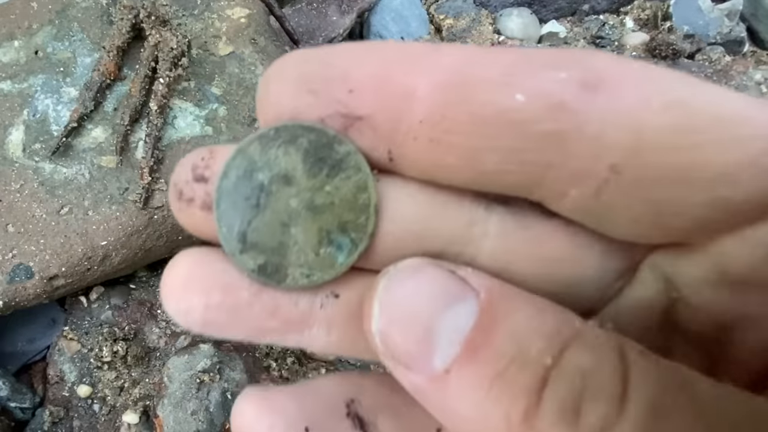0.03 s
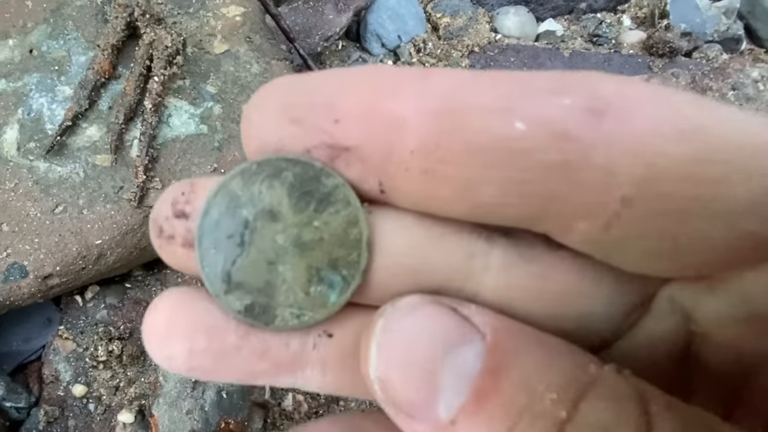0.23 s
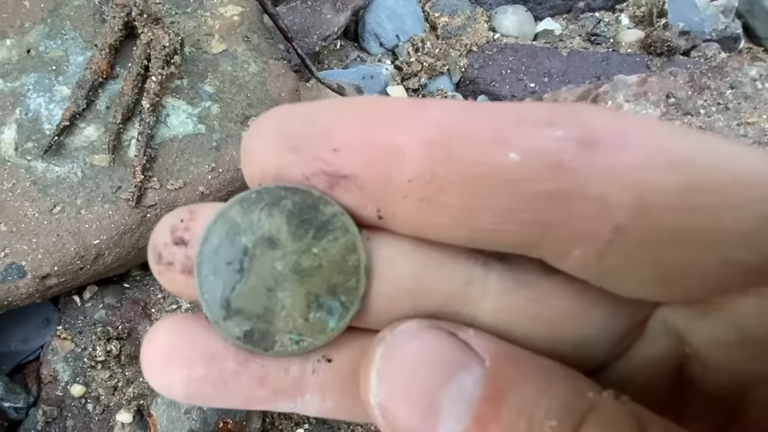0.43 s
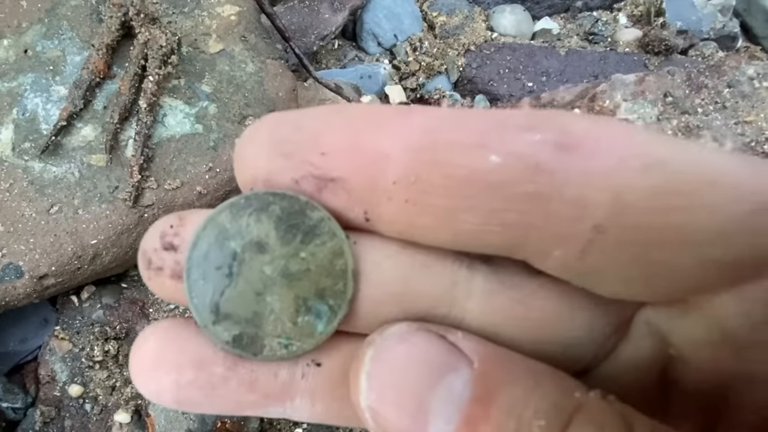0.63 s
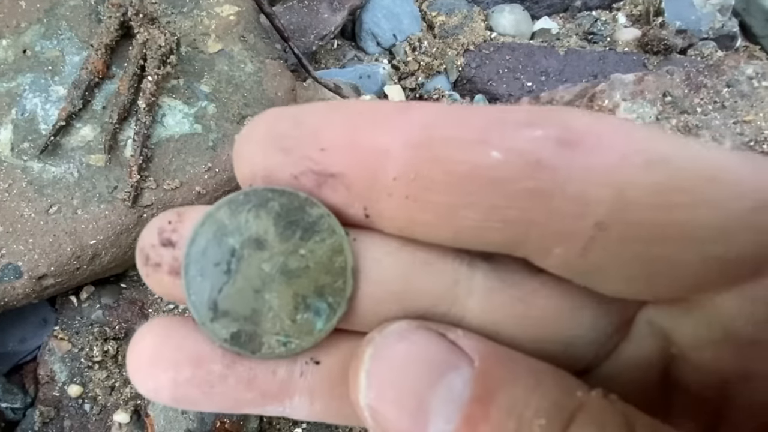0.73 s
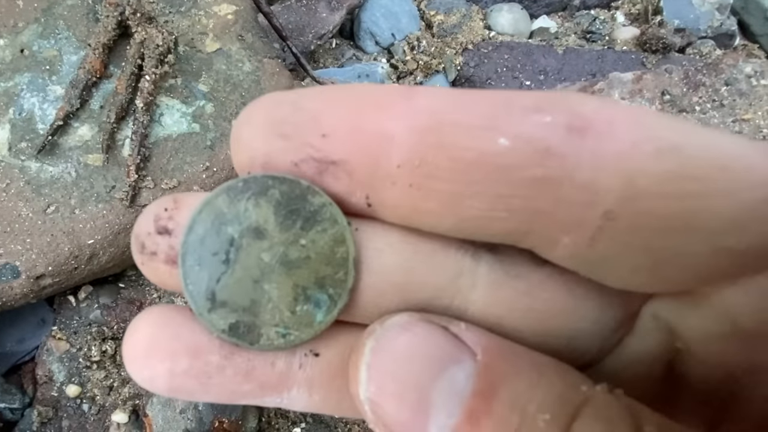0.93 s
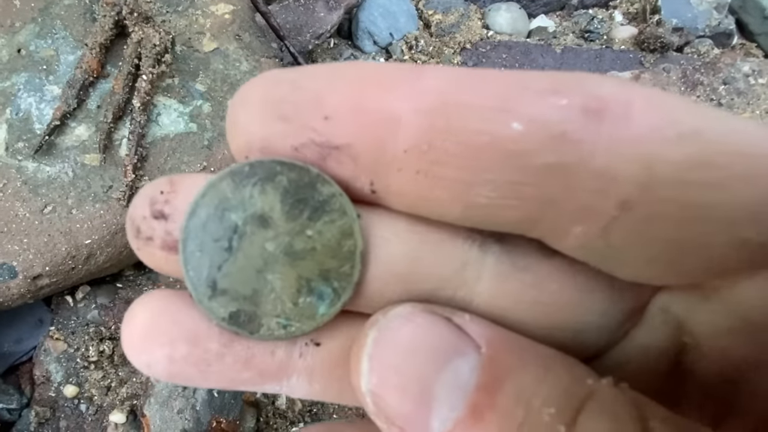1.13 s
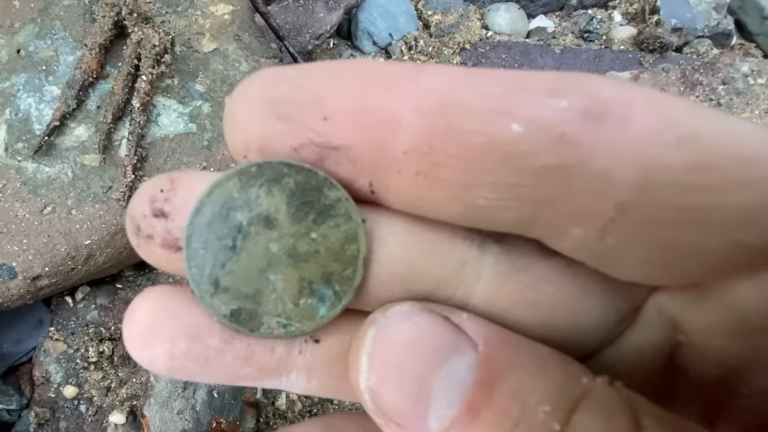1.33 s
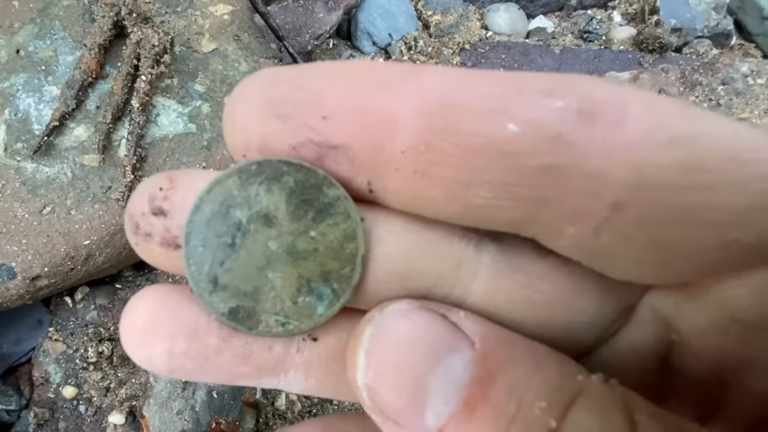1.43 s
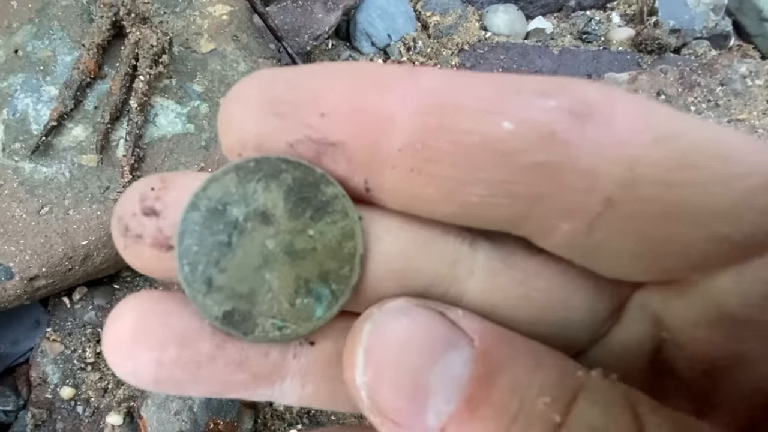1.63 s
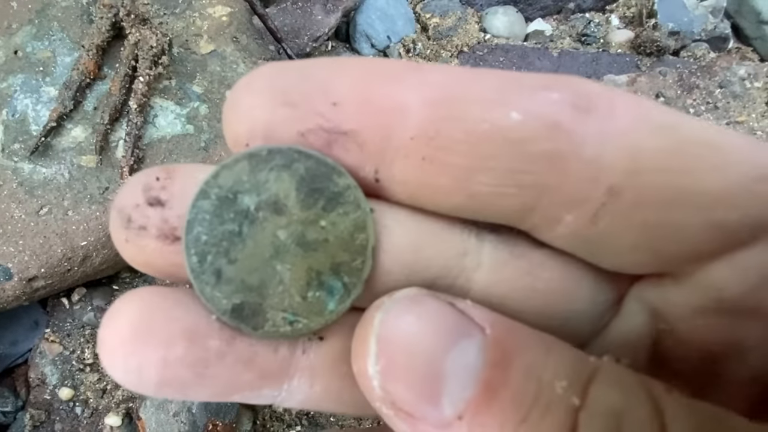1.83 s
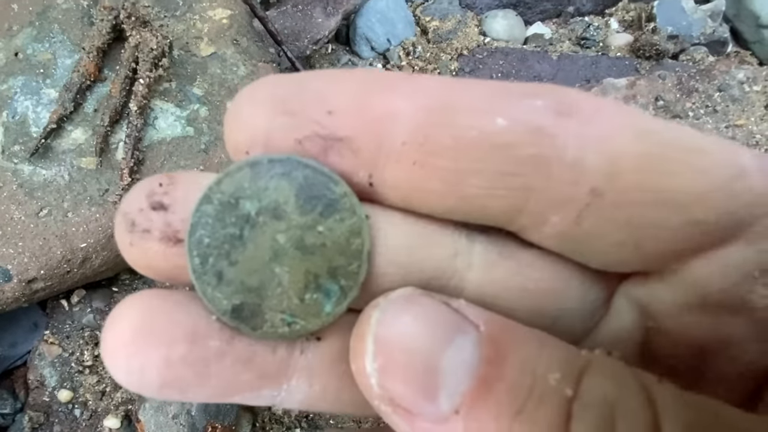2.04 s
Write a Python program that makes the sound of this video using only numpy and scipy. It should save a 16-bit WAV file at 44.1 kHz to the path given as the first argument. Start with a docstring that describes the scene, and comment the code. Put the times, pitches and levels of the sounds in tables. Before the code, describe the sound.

Stones and gravel crunch close by as someone shifts their weight. A quick clatter of stones with light metallic clinks opens, running into a gritty scrape until 0.4 seconds. After a lull, a longer crunch with sandy crackle lasts from 0.8 to 1.5 seconds, ending in a dull tap. Around 1.9 seconds pebbles tick, then clatter with louder clinks. Dull rubbing and a faint outdoor rumble lie beneath.

```python
"""Shifting weight on shingle

Someone crouching on a foreshore shifts their weight, close by. Stones knock together, each impact
exciting their damped resonances; gritty sand crunches and scrapes as a swarm of tiny impacts.
Something hard, perhaps a steel hand tool, clinks in the first clatter and louder in a second one
at the end. Dull rubbing and a low outdoor rumble lie beneath."""
import sys
import numpy as np
from scipy import signal
from scipy.fft import rfft, irfft
from scipy.io import wavfile

SR = 44100
rng = np.random.default_rng(int(sys.argv[2]) if len(sys.argv) > 2 else 0)


def master(y):
    """Save y as 16-bit WAV."""
    cut = np.clip(np.atleast_2d(y).T, -1, 1)
    pcm = np.round(cut * 32767)  # scale
    wavfile.write(sys.argv[1], SR, pcm.astype(np.int16))


N = 91551
TIME = np.arange(N) / SR
BURST_TIME = np.arange(4096) / SR


def from_db(db):
    """Amplitude grows tenfold every 20 dB."""
    return 10 ** (np.asarray(db) / 20)


def envelope(points):
    """Gain over time, linear in dB between points."""
    return from_db(np.interp(TIME, *np.transpose(points)))


def add(out, start_s, sound):
    """Superposition: a sound adds to the mix from its start time."""
    i = int(np.clip(start_s * SR, 0, N - 1))
    out[i:i + len(sound)] += sound[:N - i]


def colour(source, points):
    """Source and filter: a gain curve shapes the spectrum; the result has rms 1."""
    hz, db = np.transpose(points)
    bins_hz = np.maximum(np.fft.rfftfreq(N, 1 / SR), 1)
    gain = from_db(np.interp(np.log(bins_hz), np.log(hz), db))
    shaped = irfft(rfft(source) * gain, N)
    return shaped / np.sqrt(np.mean(shaped ** 2) + 1e-20)


def contact(modes, level_db, decay_ms, rise_ms=0.24, strike_db=-5, detune=.02, scatter_db=3):
    """Forced vibration: an impulse and a dying burst drive damped modes; level_db is the first 5 ms."""
    force = rng.standard_normal(len(BURST_TIME)) * np.exp(-BURST_TIME * 1e3 / decay_ms)
    force *= 1 - np.exp(-BURST_TIME * 1e3 / rise_ms)
    force[0] = from_db(strike_db) * np.linalg.norm(force)
    out = 0
    for k, (hz, width_hz, mode_db) in enumerate(modes):
        hz *= 1 + detune * rng.uniform(-1.25, 1)
        radius = np.exp(-np.pi * width_hz / SR)
        feedback = [1, -2 * radius * np.cos(2 * np.pi * hz / SR), radius ** 2]
        ringing = signal.lfilter([1, 0, -1], feedback, force) * (1 - radius ** 2) / 2
        out += (-1) ** k * from_db(mode_db + scatter_db * rng.standard_normal()) * ringing
    band_hz = [modes[0][0] / 2, min(modes[-1][0] * 1.3, SR * .45)]
    out = signal.sosfilt(signal.butter(2, band_hz, "band", fs=SR, output="sos"), out)
    return from_db(level_db) * out / np.sqrt(np.mean(out[BURST_TIME < .005] ** 2))


def grains(per_s, ring_ms, low_hz=196, high_hz=16630, spread_db=2.2, clump_db=3, clumps_per_s=160):
    """Shot noise: grains slip in clumps and ping briefly, the smaller ones at higher pitch."""
    candidates, ping_samples = 24000, 256
    when, chance, smallness, force, phase = rng.random((candidates, 5)).T
    clumps = np.interp(when * TIME[-1] * clumps_per_s, np.arange(N), rng.standard_normal(N))
    db = spread_db * np.minimum(-np.log(1 - force), 5) + clump_db * clumps
    gain = from_db(db) * np.sqrt(smallness)
    hz = low_hz + (high_hz - low_hz) * smallness ** 2
    slips = chance * candidates < per_s * TIME[-1]
    t = TIME[:ping_samples]
    tones = np.sin(2 * np.pi * (hz[slips, None] * t + phase[slips, None]))
    pings = gain[slips, None] * tones * np.exp(-t * 1e3 / ring_ms)
    positions = (when[slips, None] * N).astype(int) + np.arange(ping_samples)
    return np.bincount(positions.ravel(), pings.ravel(), N)[:N]


# Spectrum of the rumble. Each row: frequency in Hz, gain in dB.
RUMBLE_SPECTRUM = [(20, -21), (40, -12), (70, -5), (100, 2), (140, -6.5), (230, -1.5), (380, -18.5),
                   (550, -16), (850, -37), (1500, -33.5), (3000, -49.5), (8000, -68.5)]

def outdoor_rumble(level_db=-46.5):
    """Stationary noise with its energy at low frequencies."""
    return from_db(level_db) * colour(rng.standard_normal(N), RUMBLE_SPECTRUM)


# Course of the rubbing. Each row: time in seconds, level in dB.
RUB_LEVELS = [(0, -51.5), (.15, -44.5), (.4, -48.5), (.7, -53.5), (.95, -49), (1.2, -46.5), (1.39, -44),
              (1.55, -47), (1.75, -54), (1.9, -46.5), (2.07, -41.5)]
# Its spectrum. Each row: frequency in Hz, gain in dB.
RUB_SPECTRUM = [(60, -41), (130, 7.5), (220, -8.5), (350, -3.5), (550, -3), (900, -9), (2000, -38.5)]

def rubbing():
    """Friction noise, dull in tone, swells as the weight shifts."""
    return envelope(RUB_LEVELS) * colour(rng.standard_normal(N), RUB_SPECTRUM)


# Course of the slide, and of its treble within it. Each row: time in seconds, relative level in dB.
SLIDE_LEVELS = [(0, -91), (.022, -58), (.04, -33), (.2, -37), (.235, -32.5), (.275, -38.5), (.32, -30.5),
                (.345, -36.5), (.395, -30.5), (.415, -42.5), (.5, -51.5), (.6, -59.5), (.68, -70.5),
                (.77, -67), (.79, -36.5), (.87, -35), (.94, -29.5), (.99, -29.5), (1.025, -25),
                (1.06, -31.5), (1.11, -40.5), (1.15, -32.5), (1.18, -39), (1.25, -40), (1.34, -34.5),
                (1.4, -42.5), (1.49, -38), (1.53, -51.5), (1.63, -65.5), (1.75, -70.5), (1.84, -62),
                (1.905, -42), (1.932, -27.5), (2.04, -46), (2.07, -53)]
TREBLE_LEVELS = [(0, -4), (.4, -3.5), (.7, -0.5), (.8, -2.5), (.92, -2.5), (1.05, 1.5), (1.2, -4.5),
                 (1.35, -0.5), (1.47, -8), (1.8, 6.5), (1.93, -5), (2.07, -17)]
# Spectra of its body and treble. Each row: frequency in Hz, gain in dB.
BODY_SPECTRUM = [(200, -17.5), (500, 4.5), (900, -1), (1400, -1), (2500, 0.5), (3500, 4.5), (4700, -10.5),
                 (6000, -29), (9000, -54.5)]
TREBLE_SPECTRUM = [(3000, -25), (5000, -4), (6200, -1.5), (7500, -2), (9000, -6.5), (10500, -11.5),
                   (13000, -23.5), (16000, -26.5)]

def gravel_slide(gain_db=-5.5):
    """Granular friction: thousands of impacts a second merge into a scrape."""
    impacts = grains(per_s=9000, ring_ms=1)
    body = colour(impacts, BODY_SPECTRUM)
    treble = envelope(TREBLE_LEVELS) * colour(impacts, TREBLE_SPECTRUM)
    return from_db(gain_db) * envelope(SLIDE_LEVELS) * (body + treble)


# Strikes on the hard object. Each row: start in seconds, then level in dB in each of four registers.
CLINK_STRIKES = [(0.0251, -44, -33, -32, -37), (.0593, -40, -28, -47, -35), (0.0959, -24, -43, -39, -35),
                 (0.1115, -21.5, -42, -31.5, -31), (1.9627, -26.5, -22, -25, -15),
                 (1.975, -50, -16, -35, -21), (2.0204, -20.5, -17.5, -31, -38),
                 (2.0454, -33, -25, -32.5, -17)]
# The low, middle, upper and top registers. Each entry: frequency in Hz.
CLINK_REGISTERS = [1100, 2600, 4700, 10400]
# The object's modes. Each row: frequency in Hz, gain in dB, time to fall 60 dB in seconds.
CLINK_MODES = [(1112, 0, .07), (2330, 0, .09), (2876, -1, .085), (4400, -7, .05), (4678, 0, .17),
               (5755, -6, .04), (7130, -2, .035), (10415, 0, .045), (12550, -8, .03)]

def clinks():
    """Free vibration: the modes keep their frequencies; the spot struck decides which answer."""
    out = np.zeros(N)
    for start_s, *registers_db in CLINK_STRIKES:
        out[TIME >= start_s] = 0   # each strike stops the earlier ringing
        for hz, mode_db, t60_s in CLINK_MODES:
            strike_db = np.interp(np.log(hz), np.log(CLINK_REGISTERS), registers_db)
            start_db = mode_db + strike_db + rng.normal(0, 1)
            fall_db = 60 * np.minimum(TIME / t60_s, 10)
            add(out, start_s, from_db(start_db - fall_db) * np.sin(2 * np.pi * hz * TIME))
    return out


# Stone collisions. Each row: start in seconds, thud, clack and crack levels in dB, force decay in ms.
STONE_KNOCKS = [(0.0255, -22.5, -18.5, -16, 3.9), (.044, -23.5, -27, -31.5, 3),
                (0.0585, -21, -21, -19, 4.3), (0.0745, -28.5, -31.5, -28, 4.3), (0.08, -30, -26, -30, 0.65),
                (0.0954, -31, -25.5, -20.5, 4.1), (.1017, -28.5, -23, -26.5, 4),
                (0.1232, -28.5, -34, -22.5, 4.8), (0.1319, -43, -30.5, -25, 9.5),
                (0.1418, -27, -23.5, -22.5, 6.8), (.151, -50, -26, -31.5, 6.5),
                (0.165, -28, -24.5, -24.5, 5.2), (0.177, -36.5, -33, -36, 1.8),
                (1.776, -50.5, -45, -45.5, 9), (1.784, -43.5, -43, -36.5, 14),
                (1.942, -24.5, -25.5, -25, 5.2), (1.962, -24, -30.5, -29, 3.7),
                (1.9663, -33.5, -26.5, -19, 8.4), (1.975, -24.5, -29, -19, 4.6),
                (1.981, -28.5, -23, -25, 1.8), (1.988, -31, -46, -23.5, 1.6), (1.994, -36, -33, -32, 5.9),
                (2.0075, -31, -28.5, -23, 7.8), (2.016, -28.5, -25, -16.5, 0.61),
                (2.02, -26, -24.5, -30, 4.1), (2.041, -33, -29, -23, 3.2)]
# The stones' low, middle and high modes. Each row: frequency in Hz, bandwidth in Hz, gain in dB.
THUD_MODES = [(214, 460, -8), (600, 164, 3), (744, 265, -0.5), (997, 176, 3.5)]
CLACK_MODES = [(1680, 480, 1.4), (2250, 150, 3.5), (2670, 210, 7.7), (3263, 180, 2.4), (3757, 130, 6.8),
               (4453, 130, 10.9), (4555, 270, 7)]
CRACK_MODES = [(5800, 89, 1), (6110, 780, -7), (7240, 440, 3), (8050, 210, 3), (8580, 200, -1.5),
               (9280, 720, -1), (10500, 85, -0.5), (11340, 100, 0.5), (12100, 310, -8), (12800, 640, -6.5)]

def stone_knocks():
    """Impact excitation: each collision sounds a low thud, a clack and a bright crack."""
    out = np.zeros(N)
    for start_s, thud_db, clack_db, crack_db, decay_ms in STONE_KNOCKS:
        add(out, start_s, contact(THUD_MODES, thud_db, decay_ms))
        add(out, start_s, contact(CLACK_MODES, clack_db, decay_ms))
        add(out, start_s, contact(CRACK_MODES, crack_db, decay_ms))
    return out


# Clumps give way. Each row: start in seconds, middle and treble levels in dB, force decay in ms.
GRIT_CRUNCHES = [(0.248, -29.5, -37.5, 6.6), (.286, -32.5, -31, 5.9), (0.293, -29, -26, 6.3),
                 (.296, -24, -39.5, 2.2), (0.357, -32, -28, 6.1), (.363, -37, -33.5, 4.1),
                 (.367, -25.5, -27, 4.8), (.464, -42.5, -46, 10), (0.555, -50, -54, 6.1),
                 (.636, -54, -60.5, 2.4), (0.783, -40.5, -42, 4.5), (0.816, -32, -31, 5),
                 (0.83, -32, -31, 4.3), (0.838, -30, -31.5, 1.1), (0.863, -55, -41, 1.5),
                 (0.8821, -31.5, -28, 12), (0.9026, -30, -29.5, 5), (0.9426, -26.5, -31, 5.7),
                 (0.953, -32, -29.5, 4.5), (.9705, -34, -26, 3), (1.007, -24, -26, 15),
                 (1.013, -36, -25.5, 4.3), (1.046, -30.5, -41, 2.9), (1.548, -46.5, -53.5, 3.7),
                 (1.607, -53, -57.5, 5.2)]
# The grit's modes. Each row: frequency in Hz, bandwidth in Hz, gain in dB.
GRIT_MIDDLE_MODES = [(1440, 940, 1), (2597, 320, 13), (3780, 2700, 5.5)]
GRIT_TREBLE_MODES = [(5970, 3000, 13), (7520, 930, 17.5), (9950, 1900, 11), (12400, 3000, -4)]

def grit_crunches(rise_ms=0.75):
    """Heavy damping: small grains break loose together and ring only briefly."""
    out = np.zeros(N)
    for start_s, middle_db, treble_db, decay_ms in GRIT_CRUNCHES:
        add(out, start_s, contact(GRIT_MIDDLE_MODES, middle_db, decay_ms, rise_ms))
        add(out, start_s, contact(GRIT_TREBLE_MODES, treble_db, decay_ms, rise_ms))
    return out


# Course of the finest sand's crackle. Each row: time in seconds, level in dB.
SAND_LEVELS = [(.77, -82), (.785, -39), (.9, -35.5), (1.07, -53), (1.15, -99), (1.34, -45.5), (1.55, -84)]
# Its spectrum. Each row: frequency in Hz, gain in dB.
SAND_SPECTRUM = [(6000, -38.5), (9000, -6), (10500, 1.5), (12500, -10.5), (14000, -12), (16000, -23)]

def sand_crackle():
    """Small bodies ring high: the finest sand crackles brightly under the load."""
    return envelope(SAND_LEVELS) * colour(grains(per_s=7200, ring_ms=0.32), SAND_SPECTRUM)


# A bedded stone is tapped. Each row: start in seconds, level in dB, force decay in ms.
BEDDED_TAPS = [(1.4515, -29.5, 2.4)]
# Its modes. Each row: frequency in Hz, bandwidth in Hz, gain in dB.
BEDDED_MODES = [(815, 280, 4.5), (1450, 100, 3), (2040, 190, 7), (3280, 850, -1)]

def bedded_tap():
    """Low, damped resonances give a bedded stone its dull tap."""
    out = np.zeros(N)
    for start_s, level_db, decay_ms in BEDDED_TAPS:
        add(out, start_s, contact(BEDDED_MODES, level_db, decay_ms))
    return out


# A small stone hits its neighbour. Each row: start in seconds, level in dB.
PEBBLE_TICKS = [(1.8594, -34.5), (1.8716, -32.5), (1.8803, -53), (1.884, -25.5), (1.899, -24.5),
                (1.921, -35)]
# Its modes. Each row: frequency in Hz, bandwidth in Hz, gain in dB.
PEBBLE_MODES = [(2710, 85, 4), (4440, 150, -8.5), (4780, 120, -6), (7240, 270, -1.5), (8400, 480, -2),
                (11360, 530, -8.5), (13900, 3100, -19.5)]

def pebble_ticks():
    """A brief contact excites the high resonances of a small stone."""
    out = np.zeros(N)
    for start_s, level_db in PEBBLE_TICKS:
        add(out, start_s, contact(PEBBLE_MODES, level_db, decay_ms=2))
    return out


def reflections(direct, gain_db=-14.5, t60_s=0.057, delay_s=.003):
    """Scattering: the stony ground and the body return a short, weak spray of echoes."""
    tail = rng.standard_normal(len(BURST_TIME)) * from_db(-60 * BURST_TIME / t60_s)
    tail *= BURST_TIME > delay_s
    return from_db(gain_db) * signal.fftconvolve(direct, tail / np.linalg.norm(tail))[:N]


def scene():
    """Direct sound, reflections and background superpose in one channel."""
    impacts = clinks() + stone_knocks() + bedded_tap() + pebble_ticks()
    shingle = impacts + gravel_slide() + grit_crunches() + sand_crackle()
    return (shingle + reflections(shingle) + rubbing() + outdoor_rumble())[None]


def record(dry, cutoff_hz=16200):
    """Band limiting: a steep low-pass filter removes the highest treble."""
    return signal.sosfilt(signal.ellip(10, .2, 80, cutoff_hz, fs=SR, output="sos"), dry)


dry = scene()
out = record(dry)
master(out)
```